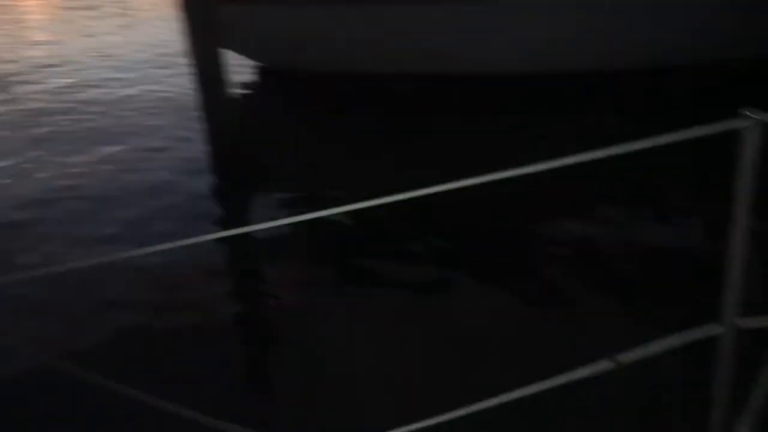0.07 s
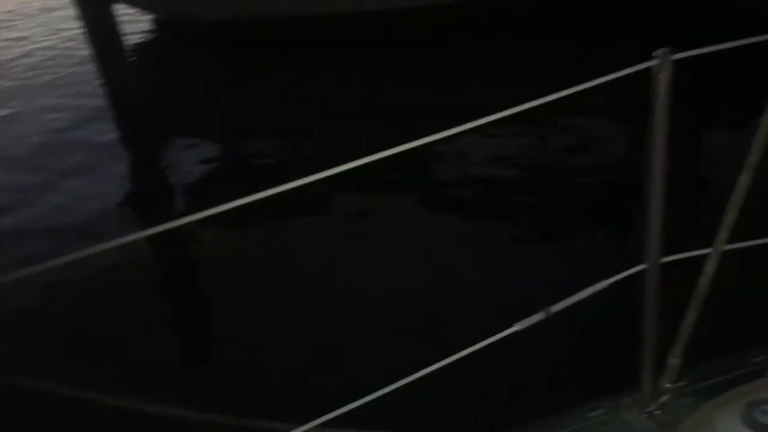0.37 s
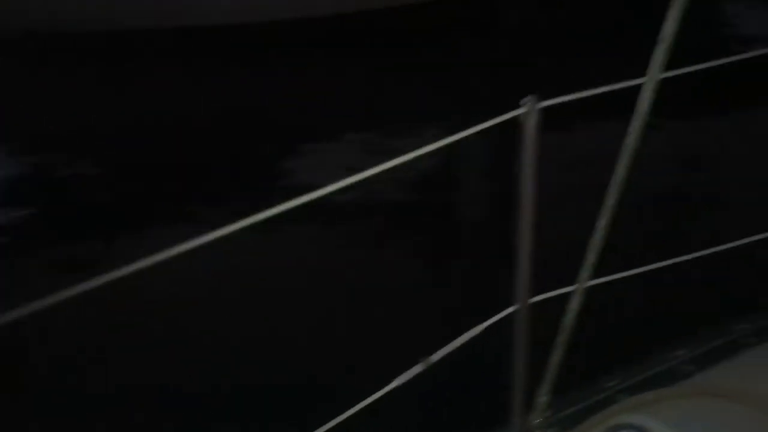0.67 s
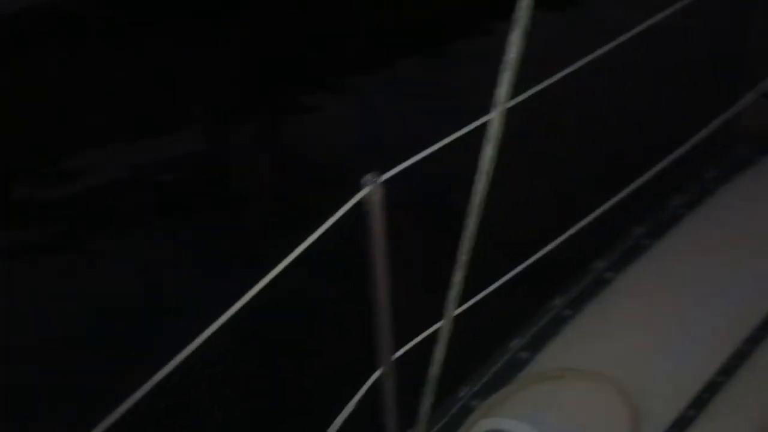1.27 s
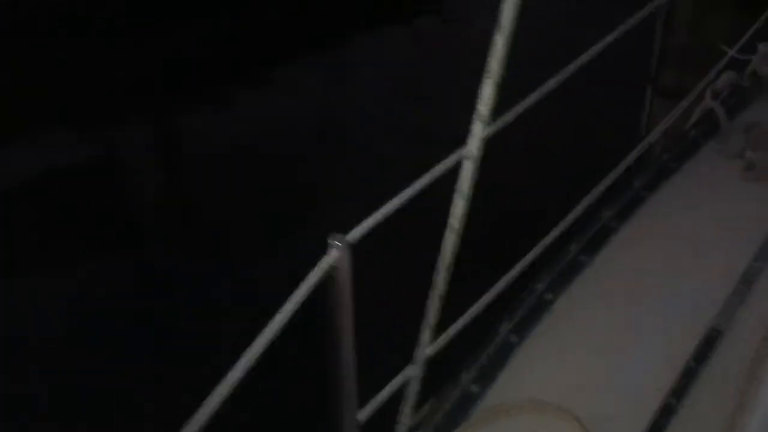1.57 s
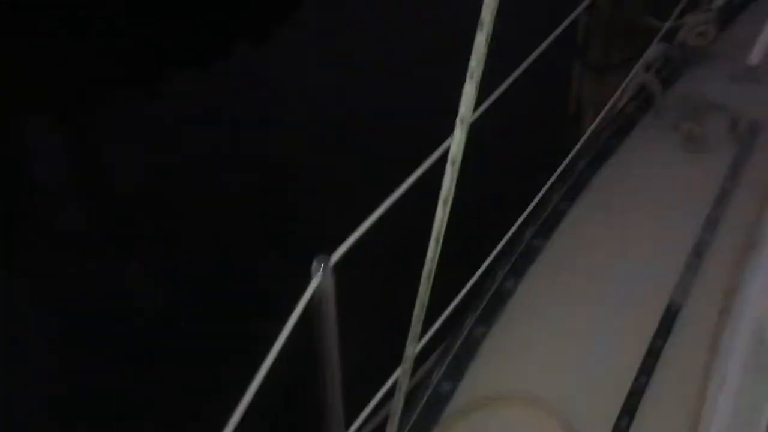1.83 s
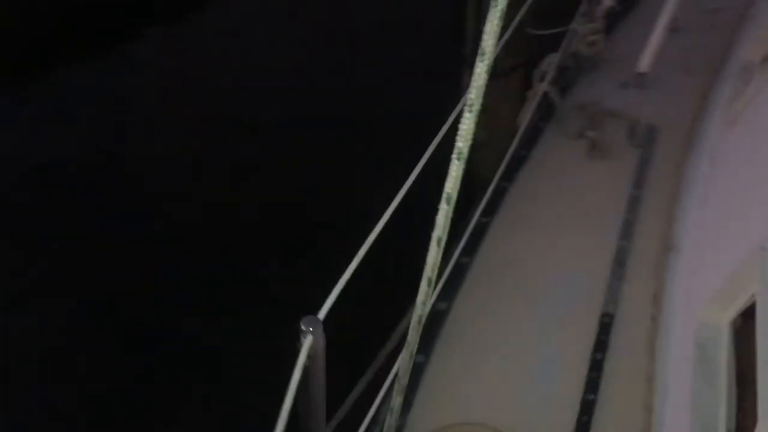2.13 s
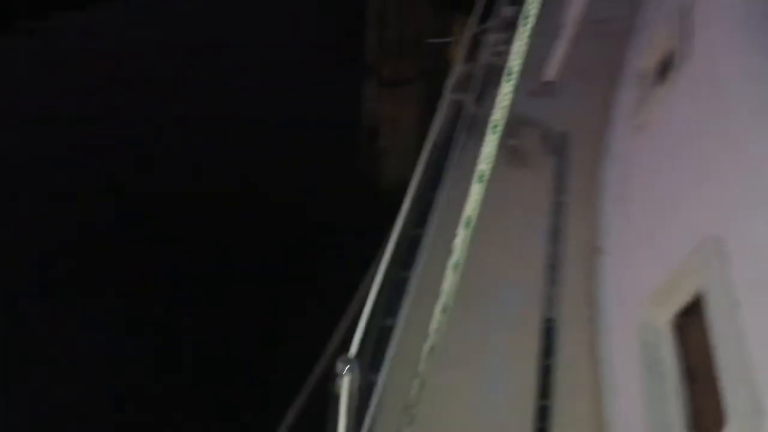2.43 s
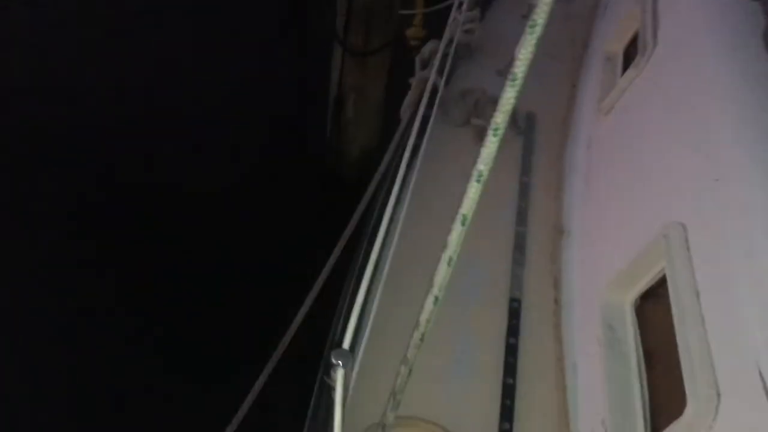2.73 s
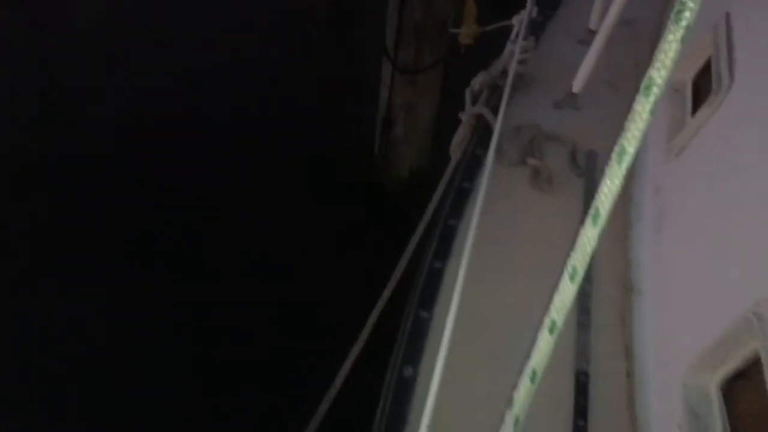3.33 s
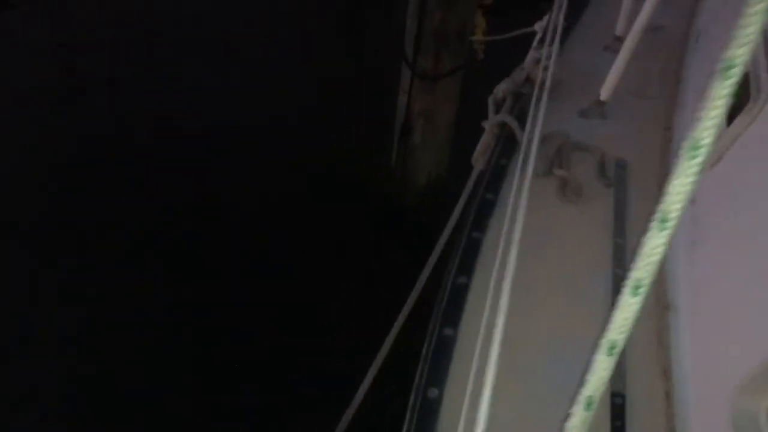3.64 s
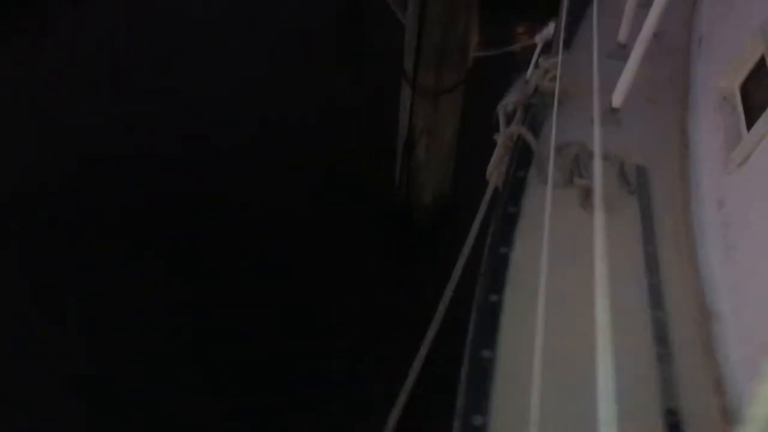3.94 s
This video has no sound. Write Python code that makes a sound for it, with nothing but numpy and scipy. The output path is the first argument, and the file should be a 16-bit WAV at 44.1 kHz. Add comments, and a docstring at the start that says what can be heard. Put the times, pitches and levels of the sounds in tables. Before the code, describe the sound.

Dull bumps and knocks on a moored sailing boat over low wind rumble and water.

```python
"""Dull bumps roll through a moored sailing boat at night, each one sliding down in pitch.
Gear knocks on the deck and sets it ringing, a taut wire ticks once, the rigging clicks lightly,
and there are short soft scuffs. Behind them, low wind rumble and a wash of water fill the marina.
Bumps, ringing and the wire are made of fading sine waves; the rest is shaped noise.
The strongest bumps just overload the microphone."""
import sys
import numpy as np
from scipy import signal
from scipy.fft import rfft, irfft, next_fast_len
from scipy.io import wavfile
from scipy.ndimage import uniform_filter1d, map_coordinates

SR = 44100
rng = np.random.default_rng(int(sys.argv[2]) if len(sys.argv) > 2 else 0)


def wav_record(signal):
    """Record a signal, one row per channel, as 16-bit PCM in the file named by sys.argv[1]."""
    frames = np.transpose(np.atleast_2d(signal))
    bounded = np.clip(frames, -1, 1)
    # unit amplitude maps onto the largest positive 16-bit level
    quanta = np.round(bounded * 32767).astype(np.int16)
    wavfile.write(sys.argv[1], SR, quanta)


N = 176400  # 4 seconds

# Dull bumps. Each row: start in seconds, level in dB, first and last pitch in Hz, length in seconds.
BOAT_BUMPS = [(0.1228, -6, 359, 62.3, 0.08), (0.277, -7, 276, 58, 0.063), (0.321, -17.5, 440, 76, 0.17),
              (0.351, -20.5, 280, 73.6, 0.33), (0.532, -9.5, 290, 70, 0.052), (0.6, -10.5, 269, 75, 0.055),
              (0.6226, -14, 393, 47.7, 0.081), (0.6503, -5, 407, 61, 0.075), (0.6954, -9, 300, 72, 0.045),
              (0.7325, -15.5, 287, 53.3, 0.097), (0.7817, -11.5, 285, 48.5, 0.082),
              (0.8516, -16, 258, 80, 0.069), (0.9177, -10.0, 252, 69.8, 0.11),
              (0.972, -10, 366, 50.7, 0.078), (1.0545, -8, 408, 55.6, 0.077), (1.1053, -11, 445, 68, 0.18),
              (1.226, -5.5, 319, 63.1, 0.075), (1.3971, -12.5, 530, 60, 0.17),
              (1.4512, -3.5, 245, 49, 0.049), (1.578, -14, 247, 97, 0.027), (1.591, -14, 406, 69.6, 0.067),
              (1.6422, -12.5, 400, 72, 0.086), (1.811, -5.5, 260, 63.6, 0.052),
              (1.8347, -6.5, 278, 98.4, 0.042), (1.8379, -16.5, 612, 79.3, 0.19),
              (2.0164, -15, 278, 64.4, 0.039), (2.191, -12, 336, 51, 0.071), (2.2323, -2.1, 395, 58, 0.084),
              (2.2782, -11.5, 378, 63.6, 0.18), (2.3162, -5, 463, 62, 0.11), (2.375, -2.2, 364, 61, 0.082),
              (2.5303, -5.5, 310, 104, 0.051), (2.7279, -4, 296, 59.6, 0.062),
              (2.842, -11, 247, 62.5, 0.09), (2.971, -15, 360, 53.3, 0.043),
              (3.2774, 1.0, 396.5, 60.8, 0.057), (3.3355, -9.0, 312, 56, 0.12),
              (3.509, 1.0, 385, 64.7, 0.088), (3.5962, -8.5, 307, 57.5, 0.065),
              (3.833, -10.5, 254, 60.6, 0.072), (3.866, -9, 368, 66, 0.07), (3.945, -12, 256, 67.5, 0.113)]
# Gear knocks. Each row: start in seconds, level in dB, extra dB for the hollow body, extra dB for the
# crack, ring time in seconds, pitch multiplier. A ring time (t60) is how long a 60 dB fade takes.
GEAR_KNOCKS = [(.326, -31.5, -1, -6, 0.061, 0.89), (.5858, -11.5, -10, -1.5, 0.021, 1.15),
               (.619, -36, 17, -10, 0.026, .8), (.6465, -25, -8, -14, 0.019, 0.96),
               (0.736, -35.5, 12.5, -3, .04, 1.07), (.743, -40.5, 18.5, -10, 0.023, 0.65),
               (.826, -38, 9, -4, 0.061, 0.59), (.845, -37, 11, -8, 0.031, 0.96),
               (1.4054, -19.5, -1, -27, .025, 0.88), (1.415, -27.5, 1, -20, 0.036, 0.72),
               (1.468, -29.5, -10, -10, 0.025, 1), (1.808, -34, 21, -31, 0.015, .45),
               (1.846, -22.5, 6.5, -28, 0.027, 0.46), (2.052, -12, -5, -1.5, 0.036, 1.015),
               (2.085, -30.5, 7, 0, 0.074, 0.92), (2.193, -29, 7, -20, .025, 0.5),
               (2.533, -30, 4, -8, 0.049, .85), (3.0491, -19.5, -25, -1.5, .028, 0.9),
               (3.073, -36, -6, 8, 0.035, 1), (3.125, -30, -11, -6, 0.026, 0.98),
               (3.285, -23.5, -4.5, -27, 0.016, 0.56), (3.517, -27.5, -6, -25, .02, 0.58),
               (3.565, -30.5, -14, -12.5, 0.015, 1.1), (3.821, -24.5, -10, -18, 0.029, 1.05),
               (3.8435, -27.5, 3, -16, 0.028, .65), (3.903, -25.5, 6.5, -3, 0.041, 0.98)]
# The gear's own tones. Each row: pitch in Hz, level in dB, multiplier of the knock's ring time.
GEAR_TONES = [(486, -7.5, 0.71), (707, -5, 1.2), (938, -3, 1.15), (1128, -1, 1.03), (1290, 1, 0.58),
              (1530, -1.5, 0.73), (1950, -9.5, 0.55), (2593, -17.5, 1.46)]
# The deck's hollow boom. Each row: pitch in Hz, level against the knock in dB, ring time in seconds.
DECK_TONES = [(229.3, -21.5, 0.12), (293.5, -18.5, 0.23), (357, -19, 0.45)]
# Light clicks of the rigging. Each row: start in seconds, level in dB.
RIGGING_CLICKS = [(.566, -49), (.587, -48), (1.404, -43), (1.559, -48), (1.92, -49), (2.988, -47),
                  (3.049, -49)]
# Scuffs. Each row: peak time in seconds, level in dB, half length in seconds, extra dB for the treble.
SOFT_SCUFFS = [(0.117, -39, 0.027, -10), (0.16, -37.5, 0.014, 0.5), (0.338, -37.5, 0.013, -3),
               (0.379, -44, 0.028, -24.5), (0.65, -48, 0.12, -14), (0.728, -38.5, 0.031, -3.5),
               (.85, -42.5, 0.015, -5.5), (0.934, -39.5, .02, -7), (1.649, -40, 0.012, -19),
               (2.137, -41, 0.021, -0.5), (2.58, -43, 0.04, -14), (3.145, -41.5, 0.084, -6),
               (3.918, -40.5, 0.033, -14), (3.995, -37.5, 0.0064, 4.5)]
# How wind and water rise and fall. Each row: time in seconds, level in dB.
WIND_LEVELS = [(0, -22.5), (.7, -23.5), (1.3, -24.5), (1.8, -25.5), (2.3, -24), (2.7, -27), (3.1, -26),
               (3.5, -29), (4, -22.5)]
WATER_LEVELS = [(0.0, -38.5), (0.15, -46), (0.41, -45), (0.78, -43), (1.14, -46), (1.69, -44.5),
                (2.38, -46), (3.09, -43.5), (3.51, -46), (4.0, -42.5)]

# A colour says how strong a noise is from low to high. Each row: frequency in Hz, relative level in dB.
CONTACT_COLOUR = [(40, -12), (130, -2.5), (300, -6.5), (450, -16), (900, -43.5), (3000, -50.5), (9000, -80)]  # the soft thud in a bump
BODY_COLOUR = [(80, -2.5), (200, -15.5), (300, 1.5), (420, -10.5), (700, -14), (1500, -65), (5000, -72)]  # the hollow low part of a knock
CLACK_COLOUR = [(200, -21.5), (500, -3.5), (700, -1), (810, -6), (930, -1.5), (1140, 2.5), (1400, -4),
                (1750, -14), (2300, -26.5), (3200, -19.5), (5000, -41)]  # the middle of a knock
CRACK_COLOUR = [(800, -12), (1800, 6), (2500, -6), (3400, 4), (4500, -9), (6200, -16), (7500, -37),
                (15000, -52)]  # the bright top of a knock
RIGGING_COLOUR = [(2000, -30), (3600, 2), (4700, 3), (6000, -3), (7500, -33), (15000, -51)]  # thin, high clicks
SCUFF_LOW_COLOUR = [(100, 7), (300, 7), (600, -2), (1200, 1), (1800, -9), (3000, -33.5), (8000, -60)]  # the dull rub of a scuff
SCUFF_HIGH_COLOUR = [(800, -18), (2000, 4.5), (3400, 5.5), (4600, -7.5), (6200, -11), (8000, -22),
                     (15000, -43.5)]  # its scratchy treble
WIND_COLOUR = [(10, -26), (25, -9.5), (38, 4.5), (50, -0.5), (65, 4), (100, -5), (160, -12), (250, -24),
               (400, -28.5), (1000, -67.5)]  # deep rumble
WATER_COLOUR = [(250, -25.5), (420, -11), (501, -11), (591, -4.5), (673, -6.5), (730, -6.5), (784, -16.5),
                (861, -10.5), (980, -6), (1120, -12), (1330, -6.5), (1500, -11.5), (1610, -16),
                (1830, -19.5), (1940, -18), (2570, -24), (2860, -21), (3930, -27.5), (4370, -33.5),
                (5340, -35), (7000, -38), (9100, -77), (15400, -120)]  # rippling wash
HISS_COLOUR = [(300, -8), (3000, -1.5), (5500, 3), (7500, -2), (9300, 0.5), (10400, -6), (11100, -1),
               (13000, -5), (15700, -12.5)]  # microphone hiss


def bumps():
    """Each bump starts high and sinks to a short low boom, with a soft noise of contact."""
    glide_s, rise_cycles, fade_shape = 0.00403, 2.98, 1.45
    boom_db, contact_db, contact_t60 = 0.6, -19, 0.053
    out, t = np.zeros(N + SR), np.arange(SR // 5) / SR
    for start, db, first_hz, last_hz, length in BOAT_BUMPS:
        rise = 1 - np.exp(-(t * first_hz / rise_cycles) ** 2)
        fade = amp(-60 * (t / length) ** fade_shape)
        swell = rise * fade
        tone = falling_tone(t, first_hz, last_hz, glide_s)
        out[int(start * SR):][:len(t)] += amp(db + boom_db) * swell / swell.max() * tone
    contact = strikes([(s, db + contact_db, contact_t60) for s, db, *_ in BOAT_BUMPS], attack_s=0.0036)
    return out[:N] + contact * noise(CONTACT_COLOUR)


def knocks():
    """Gear hits the deck with a ring, a hollow body, a clack and a crack; the hull adds a faint tail."""
    clack_db, crack_db, tail_db = -10, -14, -20.5
    attack_s, crack_share, tail_t60 = 0.00098, 0.78, 0.21
    body = strikes([(s, db + low, t60) for s, db, low, _, t60, _ in GEAR_KNOCKS], attack_s)
    clack = strikes([(s, db + clack_db, t60) for s, db, _, _, t60, _ in GEAR_KNOCKS], attack_s)
    crack = strikes([(s, db + top + crack_db, t60 * crack_share)
                     for s, db, _, top, t60, _ in GEAR_KNOCKS], attack_s / 2)
    tail = strikes([(s, db + tail_db, tail_t60) for s, db, *_ in GEAR_KNOCKS], attack_s=0.0074)
    return (gear_ring(attack_s) + (body + tail) * noise(BODY_COLOUR)
            + (clack + tail) * noise(CLACK_COLOUR) + crack * noise(CRACK_COLOUR))


def gear_ring(attack_s):
    """Every knock sets the same short-lived tones going, shifted higher or lower."""
    ring_db, scatter_db = -3, 2.5
    out, t = np.zeros(N + SR), np.arange(SR // 6) / SR
    hz, tone_db, share = np.transpose(GEAR_TONES)[..., None]
    for start, db, _, _, t60, pitch in GEAR_KNOCKS:
        start_db = db + ring_db + tone_db + scatter_db * rng.standard_normal(hz.shape)
        fades = amp(start_db - 60 * t / (t60 * share))
        tones = np.sin(2 * np.pi * (pitch * hz * t + rng.random(hz.shape)))
        rise = 1 - np.exp(-t / attack_s)
        out[int(start * SR):][:len(t)] += (fades * tones).sum(axis=0) * rise
    return out[:N]


def deck_ring(attack_s=0.0055):
    """The deck panels ring on with low tones after each knock."""
    out, t = np.zeros(N + SR), np.arange(SR // 3) / SR
    rise = 1 - np.exp(-t / attack_s)
    for start, db, *_ in GEAR_KNOCKS:
        for hz, tone_db, t60 in DECK_TONES:
            fade = amp(db + tone_db - 60 * t / t60)
            tone = np.sin(2 * np.pi * (hz * t + rng.random()))
            out[int(start * SR):][:len(t)] += rise * fade * tone
    return out[:N]


def wire_tick():
    """A tap runs along a taut wire. The highs arrive first, making a very fast falling chirp."""
    start_s, level_db, peak_s, sharpness = 0.7203, -15.5, 0.0019, 3.5
    t = np.clip(clock() - start_s, 0, 0.1)
    swell = (t / peak_s * np.exp(1 - t / peak_s)) ** sharpness
    return amp(level_db) * swell * falling_tone(t, first_hz=7240, last_hz=250, glide_s=0.001013)


def rigging(t60=0.038):
    """The rigging clicks lightly, each click a tiny burst of bright noise."""
    clicks = strikes([(s, db, t60) for s, db in RIGGING_CLICKS], attack_s=0.0012)
    return clicks * noise(RIGGING_COLOUR)


def scuffs(treble_db=-9.5, grain_db=2.2):
    """Short rubs swell and fade; a fast flutter in their level makes them grainy."""
    t = clock()
    swells = np.array([amp(db) * np.exp(-((t - s) / half) ** 2 / 2) for s, db, half, _ in SOFT_SCUFFS])
    treble = amp(np.array(SOFT_SCUFFS)[:, 3] + treble_db) @ swells
    rub = swells.sum(axis=0) * noise(SCUFF_LOW_COLOUR) + treble * noise(SCUFF_HIGH_COLOUR)
    return rub * unit(amp(grain_db * wobble(per_second=250)))


def wind(gust_db=2.43):
    """The wind rumbles low, in uneven lumps."""
    rumble = noise(WIND_COLOUR) * amp(gust_db * wobble(per_second=12))
    return amp(curve(WIND_LEVELS)) * unit(rumble)


def water(offset_db=-1.5, ripple_db=0.52):
    """Ripples around the hulls make a soft, shifting wash."""
    level_db = curve(WATER_LEVELS) + offset_db + ripple_db * wobble(per_second=10)
    return amp(level_db) * patchy(noise(WATER_COLOUR), depth_db=1.64)


def falling_tone(t, first_hz, last_hz, glide_s):
    """A sine wave whose pitch drops quickly, then settles."""
    cycles = last_hz * t + (first_hz - last_hz) * glide_s * (1 - np.exp(-t / glide_s))
    return np.sin(2 * np.pi * cycles)


def strikes(rows, attack_s):
    """The loudness over time of hits that rise quickly and die away."""
    out, t = np.zeros(N + SR), np.arange(SR // 2) / SR
    rise = 1 - np.exp(-t / attack_s)
    for start, db, t60 in rows:
        out[int(start * SR):][:len(t)] += amp(db - 60 * t / t60) * rise
    return out[:N]


def noise(colour):
    """Noise of the given colour, at an average strength of 1."""
    points_hz, db = np.transpose(colour)
    white = rng.standard_normal(N)
    return unit(filtered(white, lambda hz: amp(np.interp(np.log(hz + 1), np.log(points_hz + 1), db))))


def patchy(x, depth_db):
    """Make random patches of time and frequency louder or softer."""
    spectrum = signal.stft(x, nperseg=512)[2]
    patches = uniform_filter1d(rng.standard_normal(spectrum.shape), size=6, axis=0)
    patches = uniform_filter1d(patches, size=12, axis=1)
    return unit(signal.istft(spectrum * amp(depth_db * unit(patches)), nperseg=512)[1][:N])


def filtered(x, gain_at):
    """Turn each frequency up or down by gain_at(hz)."""
    size = next_fast_len(N + SR // 2)
    return irfft(rfft(x, size) * gain_at(np.fft.rfftfreq(size, 1 / SR)), size)[:N]


def wobble(per_second):
    """A smooth curve through evenly spaced random values."""
    points = rng.standard_normal(int(N * per_second / SR) + 4)
    return map_coordinates(points, [np.arange(N) * per_second / SR])


def curve(rows):
    """Join points of time and value with straight lines."""
    return np.interp(clock(), *np.transpose(rows))


def clock():
    """The time of every sample, in seconds."""
    return np.arange(N) / SR


def amp(db):
    """Turn decibels into a multiplier."""
    return 10 ** (np.asarray(db) / 20)


def unit(x):
    """Scale a signal to an average strength (rms) of 1."""
    return x / np.sqrt(np.mean(x ** 2) + 1e-20)


def scene():
    """Everything heard from the deck, in one channel."""
    return (bumps() + knocks() + deck_ring() + wire_tick() + rigging() + scuffs() + wind() + water())[None]


def record(dry):
    """The microphone adds hiss, flattens peaks that are too loud and loses the highest treble."""
    hiss_db, top_hz = -63, 15750
    heard = np.clip(dry[0] + amp(hiss_db) * noise(HISS_COLOUR), -1, 1)
    return filtered(heard, lambda hz: 1 / (1 + (hz / top_hz) ** 200))[None]


dry = scene()
out = record(dry)
wav_record(out)
```